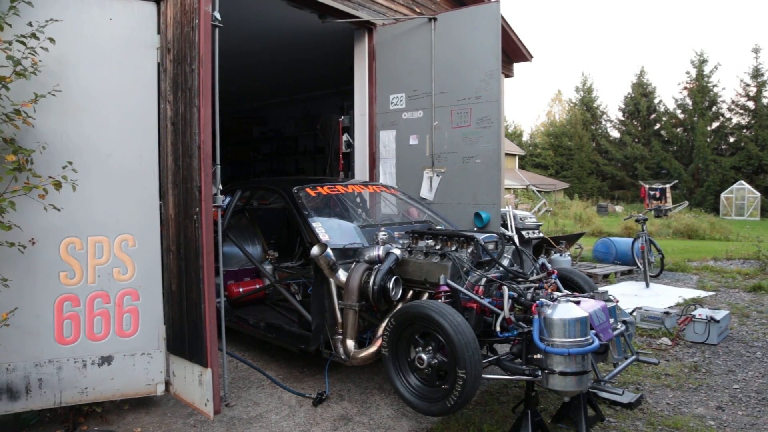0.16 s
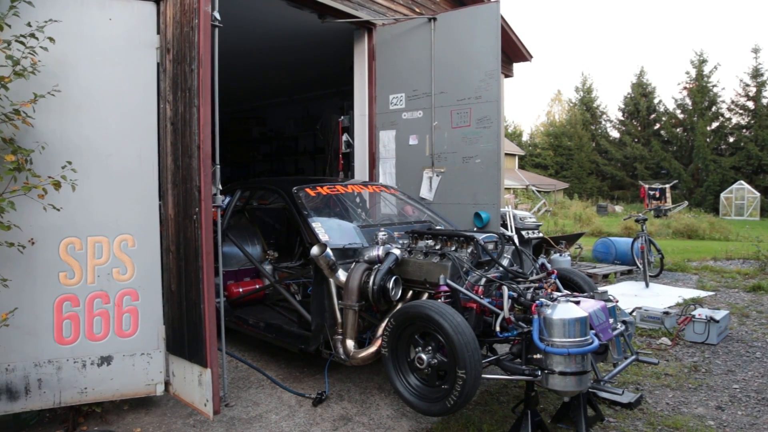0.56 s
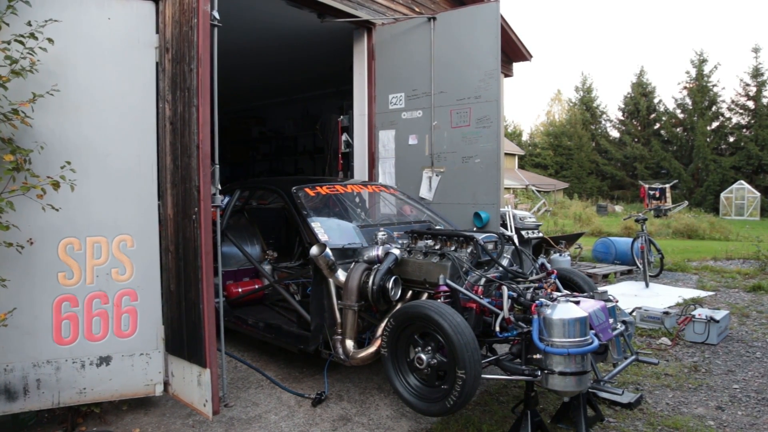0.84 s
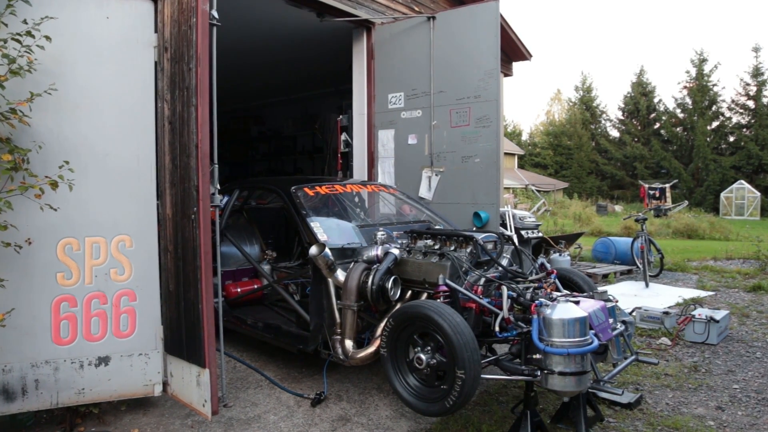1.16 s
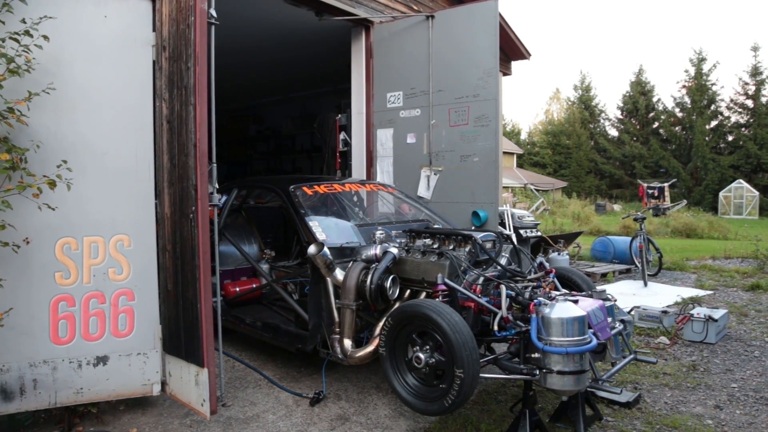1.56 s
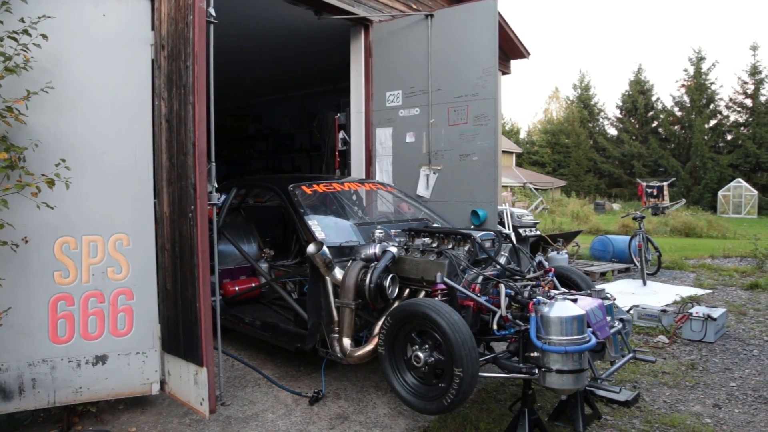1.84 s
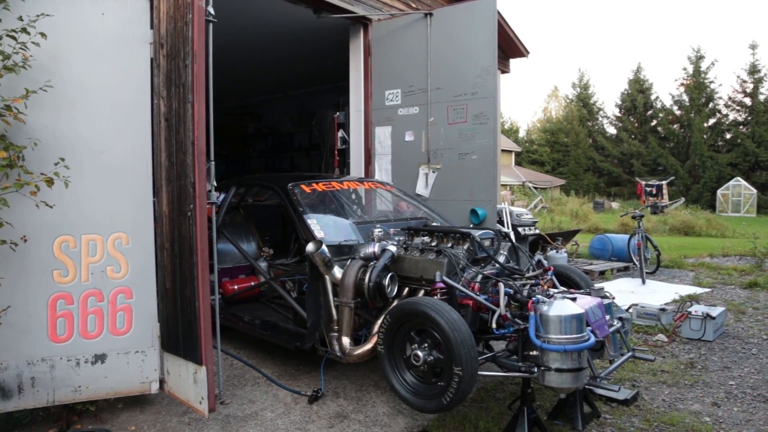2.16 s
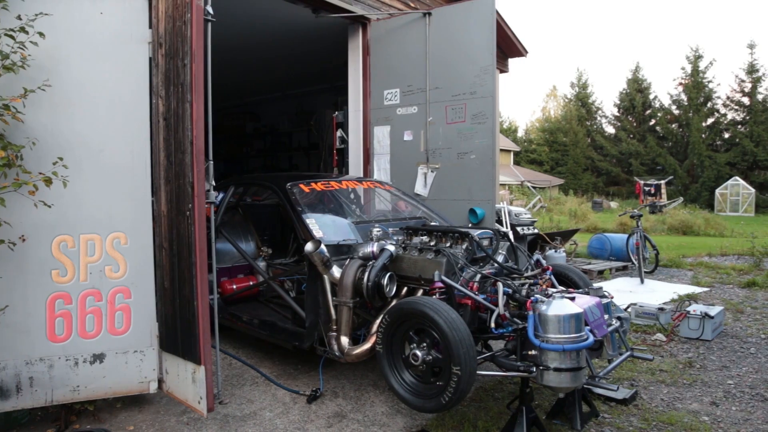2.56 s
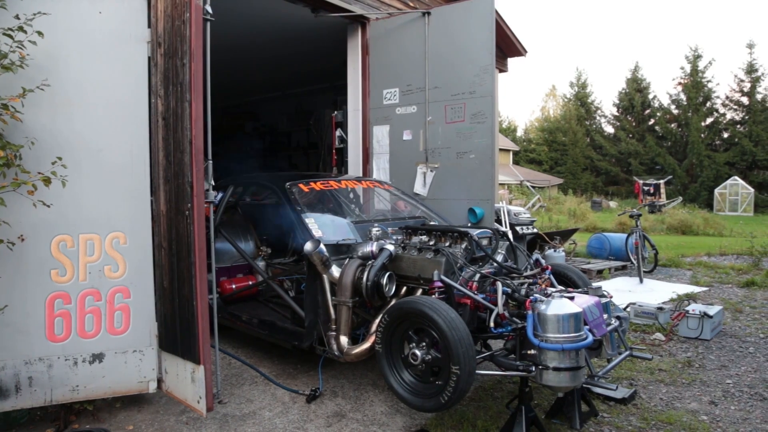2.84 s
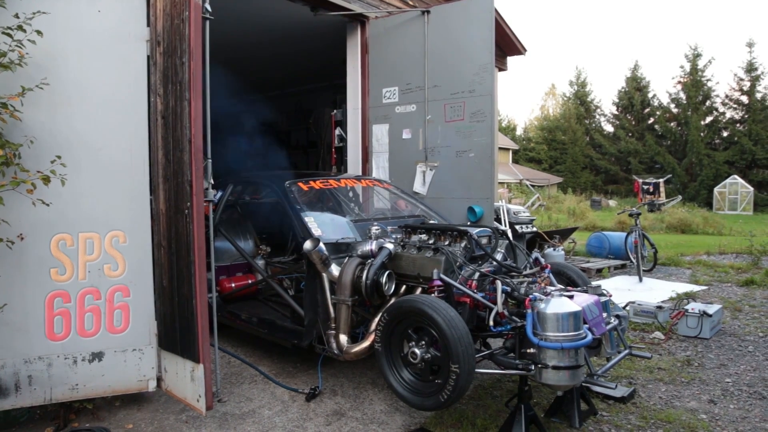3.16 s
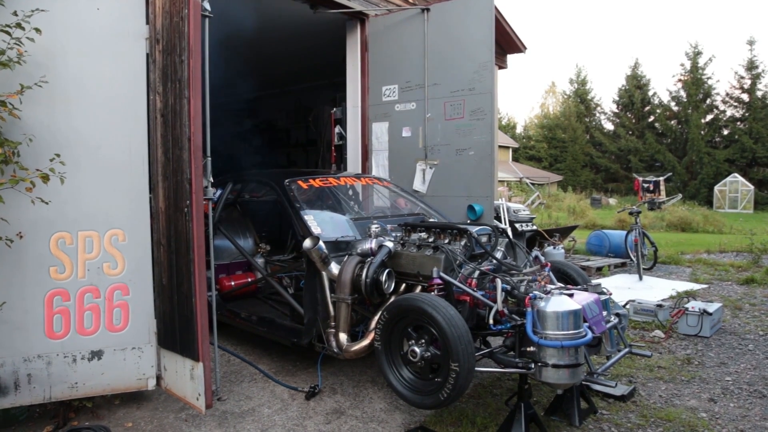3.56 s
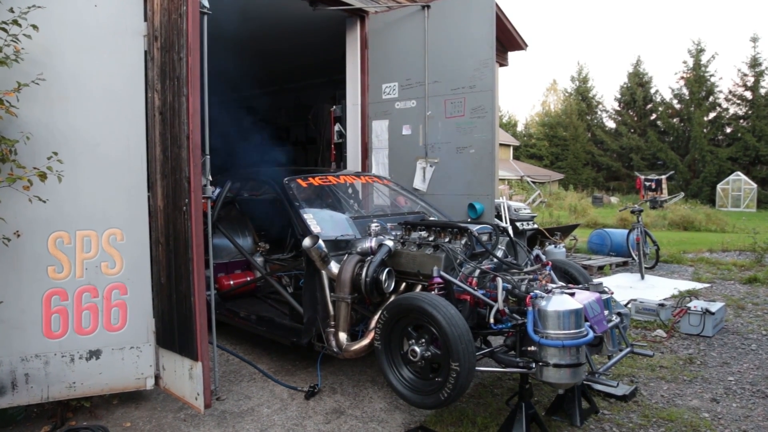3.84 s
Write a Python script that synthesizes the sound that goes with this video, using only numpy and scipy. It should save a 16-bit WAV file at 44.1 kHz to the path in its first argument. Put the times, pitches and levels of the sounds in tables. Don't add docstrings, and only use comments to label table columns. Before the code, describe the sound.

Car engine start: quiet yard, starter snap and squeaking cranks, uneven loud idle, final rising roar

```python
import sys
import numpy as np
from scipy import signal
from scipy.fft import rfft, irfft
from scipy.io import wavfile

SR = 44100
rng = np.random.default_rng(int(sys.argv[2]) if len(sys.argv) > 2 else 0)


def digitize_waveform(pressure):
    field = np.atleast_2d(pressure).T
    bounded = np.clip(field, -1, 1)
    quanta = np.round(bounded * 32767).astype(np.int16)
    wavfile.write(sys.argv[1], SR, quanta)


def ratio(d):
    e = np.asarray(d, float) / 20
    return 10 ** e


N = 176400
TIME = np.arange(N) / SR


def evened(x):
    return x / np.sqrt(np.mean(x ** 2) + 1e-20)


def noise(points):
    hz, db = np.transpose(points)
    bins = np.fft.rfftfreq(N, 1 / SR)
    shape = ratio(np.interp(np.log(bins + 1), np.log(hz), db))
    return evened(irfft(rfft(rng.standard_normal(N)) * shape, N))


def wander(hz):
    coarse = signal.lfilter(*signal.butter(2, hz, fs=SR / 20), rng.standard_normal(N // 20))
    return np.interp(TIME, TIME[::20], evened(coarse))


def resonate(x, hz, width):
    turn = np.exp(2j * np.pi * np.cumsum(hz * np.ones(len(x))) / SR)
    r = np.exp(-np.pi * width / SR)
    return 2 * (turn * signal.lfilter([1 - r], [1, -r], x / turn + 1e-18)).real


def swell(start, rise, fall):
    out, t = np.zeros(N), TIME[:SR // 4]
    first = round(start * SR)
    shape = (1 - np.exp(-(t / rise) ** 2)) * np.exp(-t / fall) * 2
    out[first:][:len(t)] = shape[:N - first]
    return out


def clicks(times, sizes):
    return np.bincount(np.clip(np.round(times * SR).astype(int), 0, N - 1), sizes, N)


def tones(rows):
    out = np.zeros(N)
    for s, hz, db, length in rows:
        turns = np.cumsum(hz * (1 + 0.019 * wander(hz=29.8))) / SR
        out += ratio(db) * swell(s, length / 3, length) * np.sin(2 * np.pi * turns)
    return out


# t/s, firing rate f/Hz, exhaust level/dB, air flow level/dB, clatter level/dB
ENGINE = [(2.74, 64.2, -27, -37.5, -37), (2.8, 75.4, -24.5, -25.5, -31.5), (2.86, 96.4, -13.5, -27, -28),
          (2.92, 115, -16, -27.5, -29.5), (2.98, 115, -19.5, -34.5, -30.5), (3.15, 118.6, -19.5, -37, -29),
          (3.22, 120, -15.5, -37, -30), (3.29, 121, -23.5, -38, -30), (3.6, 108, -19.5, -37.5, -31.5),
          (3.72, 120.6, -14.5, -29.5, -29.5), (3.8, 138, -16, -27.5, -27), (3.84, 144.5, -9, -25.5, -23),
          (3.875, 158, -5.5, -23.5, -20.5), (3.92, 179, -6, -23.5, -21.5), (4, 211, -6.5, -23, -21.5)]
CATCH_S, FIRST_TURN = 2.745, 0.606


def engine():
    columns = np.transpose(ENGINE)
    rate, effort_db, flow_db, clatter_db = (np.interp(TIME, columns[0], c) for c in columns[1:])
    turns = FIRST_TURN + np.cumsum(rate * (TIME > CATCH_S)) / SR
    exhaust = firings(turns, rate, effort_db) + cycle_hum(turns, rate, effort_db)
    loud_firings, puffs = bangs(effort_db)
    beat = np.exp(-(turns % 1) / 1.4) + 0.48 * puffs
    running = np.clip((TIME - 2.7) / 0.031, 0, 1)
    moving = running * (valve_gear(clatter_db, beat) + intake(flow_db, beat))
    return exhaust + loud_firings + moving + spits()


# t/s, level/dB
POPS = [
    (2.678, -25),
    (2.693, -24),
    (2.739, -27.5),
    (2.759, -20.5),
    (2.769, -28),
]


def firings(turns, rate, effort_db):
    idle_db, load_db, jitter_s = -7.5, -19, 0.00097
    at = np.flatnonzero(np.diff(np.floor(turns)))
    chance = rng.standard_normal((200, 2))[:len(at)]
    uneven_db = np.interp(rate[at], [122, 150], [idle_db, load_db])
    size = ratio(effort_db[at] + uneven_db) * chance[:, 0]
    when = at / SR + jitter_s * chance[:, 1]
    pop_s, pop_db = np.transpose(POPS)
    thuds = clicks(when, size) + clicks(pop_s, ratio(pop_db))
    return signal.oaconvolve(thuds, pipe(EXHAUST_PIPE))[:N]


# f/Hz, level/dB, t60/s
EXHAUST_PIPE = [(51, -8, 0.11), (123, 4.5, 0.029), (175, -3.5, 0.06), (325, -6, 0.061), (530, -25, 0.082),
                (435, -14, 0.063)]


def pipe(modes):
    t = TIME[:6000]
    return -sum(ratio(db - 60 * t / t60) * np.sin(2 * np.pi * hz * t) for hz, db, t60 in modes)


def cycle_hum(turns, rate, effort_db):
    load = np.clip((rate - 120) / 25, 0, 1)
    slow = np.clip((112 - rate) / 25, 0, 1)
    idle_db = -3.5 * np.clip((140 - rate) / 15, 0, 1)
    fade_in = np.clip((TIME - CATCH_S) / 0.033, 0, 1)
    return fade_in * ratio(effort_db + idle_db) * lines(turns, load, slow)


# multiple, idle level/dB, load level/dB
CYCLE_LINES = [(6, -7.5, -12.5), (8, 1.5, -0.6), (10, -15, -19), (11, -11.5, -8), (13, -5.5, -7.5),
               (15, -13, -13), (19, -13.5, -15), (21, -14, -18), (24, -14.5, -15), (31, -19.5, -22.5),
               (40, -20.5, -35)]
NEAR_BANK = np.array([0, 1, 0, 1, 1, 0, 1, 0])


def lines(turns, load, slow):
    waver_idle, waver_load = 0.49, 0.18
    tilt_db = 5.5
    pattern = np.angle(np.fft.fft(NEAR_BANK))
    spread = waver_idle + (waver_load - waver_idle) * load
    out = np.zeros(N)
    for k, idle_db, load_db in CYCLE_LINES:
        k = int(round(k))
        phase = 2 * np.pi * k * turns / 8 + pattern[k % 8] - np.pi / 2 * np.log2(k)
        waver = spread * np.sqrt(k / 12) * (0.55 if k == 8 else 1)
        level = ratio(tilt_db * np.log2(k / 8) * slow + idle_db + (load_db - idle_db) * load)
        steady = (1 + waver * wander(hz=16.3)) * np.cos(phase)
        out += level * (steady + waver * wander(hz=15.5) * np.sin(phase))
    return out


# t/s, level/dB
BANGS = [(2.781, -14.2), (2.8102, -14.5), (2.824, -11), (2.8337, -12), (2.8469, -10.5), (2.856, -7.5),
         (2.8668, -7), (2.8764, -10.5), (2.9054, -8.3), (2.9121, -12), (2.9463, -7.5), (2.9658, -8),
         (2.9759, -8.5), (3.0011, -9), (3.0168, -8.5), (3.0557, -8), (3.0876, -10), (3.1041, -9),
         (3.1564, -16), (3.1733, -11.5), (3.1849, -8), (3.199, -8), (3.2181, -9.5), (3.2258, -9.5),
         (3.243, -6), (3.31, -14.7), (3.3215, -20), (3.3535, -14), (3.3636, -16.2), (3.38, -11), (3.4, -18),
         (3.4128, -14), (3.4321, -15), (3.4498, -10.5), (3.4691, -11.5), (3.4809, -13), (3.4923, -15),
         (3.5185, -12.5), (3.5391, -11), (3.5501, -20), (3.5895, -10.5), (3.6156, -12), (3.6341, -7),
         (3.661, -8), (3.702, -4), (3.7124, -9.5), (3.7282, -9.5), (3.7381, -7), (3.7458, -15),
         (3.7778, -10), (3.7924, -8), (3.8015, -6.5)]


def bangs(effort_db):
    s, db = np.transpose(BANGS)
    start = s - 0.0031
    exhaust = signal.oaconvolve(clicks(start, ratio(db - 3)), bang())[:N]
    over_db = db - effort_db[(s * SR).astype(int)] - 8.0
    puffs = signal.oaconvolve(clicks(start, ratio(over_db)), np.exp(-TIME[:1500] / 0.0081))[:N]
    return exhaust, puffs


def bang():
    push_hz, push_s = 186.3, 0.0026
    t = TIME[:6000]
    push = -np.sin(2 * np.pi * push_hz * t) * t / push_s * np.exp(1 - t / push_s)
    upper = np.minimum(t / 0.0024, 1) * pipe([(348.4, -10.5, 0.068)])
    return push + ratio(-15) * pipe(EXHAUST_PIPE) + upper


# f/Hz, level/dB per Hz
CLATTER = [(350, -4), (600, -4.5), (770, -11.5), (2020, -12.5), (5500, -19), (9000, -20.5), (11700, -63)]
# f/Hz, width f/Hz, level/dB
CLATTER_RINGS = [(1379, 14, 3.5), (1964, 200, 1.5), (2204, 66, 1)]


def valve_gear(clatter_db, beat):
    taps = (rng.random(N) < 2500 / SR) * rng.standard_normal(N)
    rings = evened(sum(ratio(db) * evened(resonate(taps, hz, width)) * np.sqrt(width)
                       for hz, width, db in CLATTER_RINGS))
    level = ratio(clatter_db + 0.78 * wander(hz=30.3)) * (1 + 0.38 * beat)
    return level * (noise(CLATTER) + 0.35 * rings)


# f/Hz, level/dB per Hz
HISS = [(2500, -8.5), (5000, -5), (8000, -2), (10500, -2.5), (12500, -3), (14000, -9), (16000, -10)]
# t/s, f/Hz
WHOOSH = [
    (2.7, 12000),
    (2.8, 9650),
    (3.6, 11040),
    (3.72, 11500),
    (4, 10290),
]


def intake(flow_db, beat):
    hz, width = np.interp(TIME, *np.transpose(WHOOSH)), 2400
    whoosh = evened(resonate(resonate(rng.standard_normal(N), hz, width), hz, width))
    flow = ratio(flow_db + 0.88 * wander(hz=39.8)) * (1 + 0.13 * beat)
    return flow * (noise(HISS) + ratio(-6 + 2 * wander(hz=25)) * whoosh)


# t/s, level/dB
SPITS = [
    (2.678, -30),
    (2.69, -36),
    (3.033, -33),
    (3.104, -33),
    (3.213, -30),
    (3.238, -33),
    (3.374, -29),
    (3.446, -34),
    (3.585, -31.5),
    (3.631, -30),
]


def spits():
    bursts = sum(ratio(db) * swell(s, 0.0033, 0.014) for s, db in SPITS)
    return bursts * noise([(6000, -14), (9000, -1.0), (12000, 2.0), (16000, -15)])


# t/s, air level/dB, squeak level/dB, squeak f/Hz
STROKES = [
    (2.341, -39, -39, 3250),
    (2.415, -34, -29.5, 2780),
    (2.439, -38.5, -31, 2700),
    (2.489, -30.5, -28, 3030),
    (2.553, -31.5, -21.5, 3227),
    (2.619, -28, -20, 3280),
]
# f/Hz, level/dB per Hz
AIR = [(250, -15), (500, -8.5), (2360, -12.5), (3050, -6), (3870, -15.5), (5890, -8), (12500, -20.5),
       (15800, -32)]
# t/s, level/dB, f/Hz
YELP = (2.4, -25, 1830)


def strokes():
    air, out = noise(AIR), np.zeros(N)
    for s, air_db, squeak_db, hz in STROKES:
        sag = 0.065 * np.clip((TIME - s) / 0.0323, 0, 1)
        phase = 2 * np.pi * np.cumsum(hz * (1 - sag + 0.00484 * wander(hz=200))) / SR
        squeak = ratio(-4.5) * np.sin(phase) + np.sin(2 * phase) + ratio(-17) * np.sin(3 * phase)
        out += ratio(air_db) * swell(s, 0.008, 0.013) * air
        out += ratio(squeak_db) * swell(s, 0.011, 0.0059) * squeak * 2
    s, db, hz = YELP
    gasp = evened(resonate(resonate(air, hz, 363), hz, 530))
    return out + ratio(db) * swell(s, 0.0028, 0.007) * gasp


# t/s, level/dB
STARTER = [
    (2.19, -45.5),
    (2.26, -38.5),
    (2.34, -43),
    (2.399, -44),
    (2.47, -46),
    (2.76, -38),
]
# f/Hz, width f/Hz, level/dB
GEARS = [(973, 57, 0), (2036, 100, 0.5), (4470, 180, -4.5), (6264, 86, 10), (6720, 230, 8)]
# f/Hz, level/dB per Hz
GRIND = [(30, -18), (90, 4), (250, -12), (480, -6), (3890, -14), (12800, -21), (13800, -31), (15800, -32)]
# t/s, f/Hz, level/dB, length t/s
BELLS = [
    (2.19, 949, -40.5, 0.016),
    (2.218, 1120, -41, 0.03),
    (2.335, 952, -42, .03),
    (2.34, 495, -41.5, 0.021),
    (2.415, 8150, -44, .012),
]
ENGAGE_S = 2.1815


def starter():
    mesh_hz = np.interp(TIME, *np.transpose(WHINE)[:2]) / 2 * (1 + 0.004 * wander(hz=39.7))
    mesh = np.diff(np.floor(np.cumsum(mesh_hz) / SR), prepend=0)
    stray = (rng.random(N) < 740 / SR) * rng.standard_normal(N)
    teeth = evened(mesh) + 0.5 * evened(stray)
    rings = np.zeros(N)
    for hz, width, db in GEARS:
        ring = evened(resonate(resonate(teeth, hz, width * 2.0), hz, width * 3))
        rings += ratio(db + 5.6 * wander(hz=50.7)) * ring * np.sqrt(width)
    load = ratio(np.interp(TIME, *np.transpose(STARTER)))
    load *= np.clip((TIME - ENGAGE_S) / 0.0021, 0, 1) * np.clip((3 - TIME) / 0.12, 0, 1)
    grind = ratio(1 + 1.0 * wander(hz=29.8)) * noise(GRIND)
    return load * (evened(rings) + grind) + engagement() + whine() + tones(BELLS)


def engagement():
    after = np.maximum(TIME - ENGAGE_S, 0)
    snap = ratio(-23 - 60 * after / 0.037) * (after > 0)
    snap = snap * noise([(500, -31.0), (2500, 5), (7000, -2.5), (12000, -4.5), (16000, -8)])
    clunk = ratio(-33.5) * swell(ENGAGE_S + 0.0057, 0.013, 0.029)
    return snap + clunk * noise([(200, -17), (470, 7), (700, -11), (950, 0), (1400, -18), (3000, -37)])


# t/s, f/Hz, level/dB
WHINE = [
    (2.2, 621, -45.5),
    (2.26, 790, -41.5),
    (2.28, 865, -49),
    (2.33, 1060, -41.5),
    (2.39, 1092, -43),
    (2.429, 1060, -59),
    (2.6, 1072, -67),
]
# multiple, level/dB
WHINE_ORDERS = [(2, -8.5), (4, -8), (5, -7.5), (6, -4.5), (8, -13)]


def whine():
    s, hz, db = np.transpose(WHINE)
    speed = np.interp(TIME, s, hz)
    level = (TIME > s[0]) * (TIME < s[-1]) * ratio(np.interp(TIME, s, db))
    whistles = np.zeros(N)
    for k, order_db in WHINE_ORDERS:
        fuzz = resonate(resonate(rng.standard_normal(N), k * speed, 110), k * speed, 200)
        whistles += ratio(order_db) * evened(fuzz)
    return level * whistles


def shed(x):
    taps = np.zeros(SR // 2)
    slots = np.arange(300, SR // 2 - 20, 20)
    count = len(slots)
    taps[slots + rng.integers(0, 20, count)] = rng.choice([-1., 1.], count)
    taps *= ratio(-60 * TIME[:SR // 2] / 0.14)
    return signal.fftconvolve(x, taps / np.linalg.norm(taps))[:N]


# f/Hz, level/dB per Hz
YARD = [(18, -12), (45, 4.5), (134, -12), (183, -4.5), (350, -11.5), (900, -12.5), (2800, -22.5),
        (11200, -8), (15800, -16.5)]
# t/s, f/Hz, level/dB, length t/s
HOLLOWS = [
    (.85, 182, -72, 0.088),
    (.99, 250, -68, .03),
    (1.035, 160, -66.5, 0.028),
    (1.1, 264, -73.5, .08),
    (1.445, 291, -73, 0.047),
    (1.445, 203, -76, .06),
    (1.59, 100, -67, 0.022),
    (1.59, 390, -70, 0.015),
]


def yard():
    air = ratio(-68 + 0.87 * wander(hz=11)) * noise(YARD)
    return air + insects() + tones(HOLLOWS) + scuffs() + ticks()


# f/Hz, width f/Hz, level/dB
CHIRRS = [(6380, 200, -84), (11000, 60, -79), (11500, 60, -79.5), (12000, 150, -85), (12900, 200, -86)]


def insects():
    hz, width = 11080, 760
    main = evened(resonate(resonate(rng.standard_normal(N), hz, width), hz, width))
    out = ratio(-73 + 1.5 * wander(hz=40)) * main
    for hz, width, db in CHIRRS:
        out += ratio(db + 2.5 * wander(hz=16)) * evened(resonate(rng.standard_normal(N), hz, width))
    return out


# middle t/s, length t/s, level/dB
SCUFFS = [
    (0.097, 0.21, -73.5),
    (1.027, 0.17, -73),
    (1.693, 0.02, -59),
    (1.735, .05, -65.5),
    (1.82, 0.39, -76),
]
# f/Hz, level/dB per Hz
SCUFF = [(60, -9), (200, 0), (300, 0), (700, -7.5), (2500, -9), (6000, -50)]


def scuffs():
    shape = sum(ratio(db) * np.exp(-((TIME - s) / length * 2) ** 2) for s, length, db in SCUFFS)
    return noise(SCUFF) * ratio(5.1 * wander(hz=250)) * shape


# t/s, peak level/dB, f/Hz
TICKS = [(0.067, -47, 1230), (0.139, -58, 541), (0.188, -46.5, 1040), (0.256, -58, 1570),
         (1.029, -49.5, 501), (1.042, -49.5, 515), (1.068, -60, 584), (1.268, -56.5, 536),
         (1.444, -47.5, 3820), (1.683, -47.5, 1050), (1.719, -46, 2550), (1.73, -57, 530),
         (1.792, -46, 1592), (1.819, -53, 2400), (1.872, -49.5, 2020), (1.955, -43, 1420),
         (2.098, -60, 1060)]


def ticks():
    out, t = np.zeros(N), TIME[:2000]
    for s, db, hz in TICKS:
        knock = np.sin(2 * np.pi * hz * t) * np.exp(-t * hz / 1.07)
        grit = evened(resonate(rng.standard_normal(2000), hz, hz)) * np.exp(-t / 0.0097)
        out[round(s * SR):][:2000] += ratio(db + 0.5) * (knock + ratio(-16) * grit)
    return out


def scene():
    car = engine() + strokes() + starter()
    mid = car + ratio(-12.5) * shed(car) + yard()
    side = ratio(-35) * shed(mid)
    return np.array([mid + side, mid - side])


def top_cut(x):
    return signal.sosfilt(signal.butter(12, 16330, fs=SR, output="sos"), x)


def record(dry):
    low_cut = signal.lfilter(*signal.butter(2, 40, "high", fs=SR), dry)
    limited = np.tanh(low_cut / 1.039) * 1.051
    treble_limit = signal.firwin(1501, 15790, window=("kaiser", 9), fs=SR)
    mix = signal.oaconvolve(limited, treble_limit[None], "same")
    return top_cut(mix)


dry = scene()
out = record(dry)
digitize_waveform(out)
```